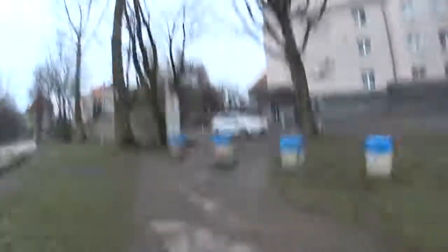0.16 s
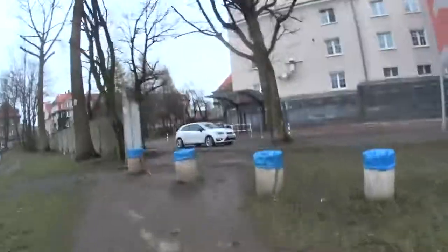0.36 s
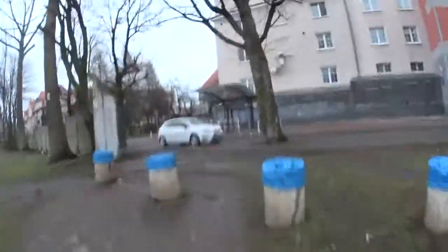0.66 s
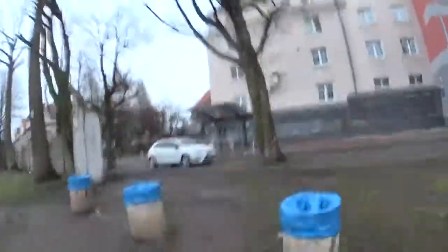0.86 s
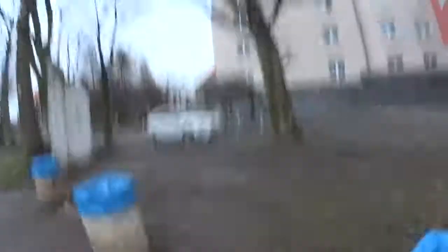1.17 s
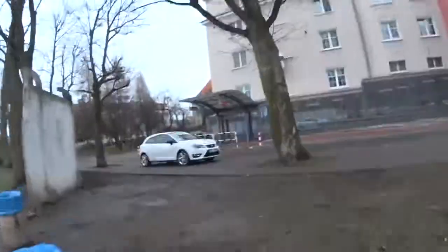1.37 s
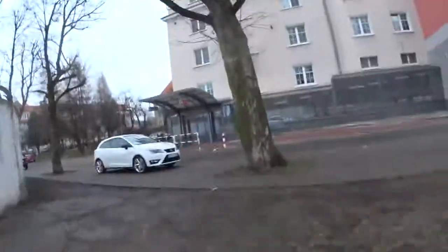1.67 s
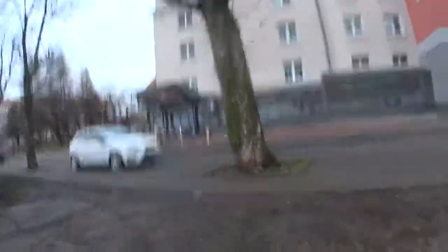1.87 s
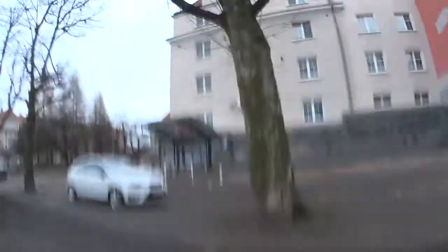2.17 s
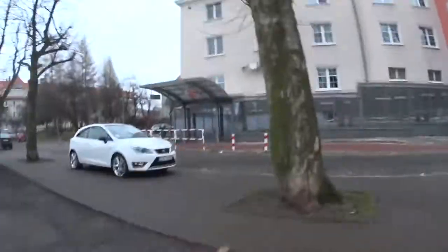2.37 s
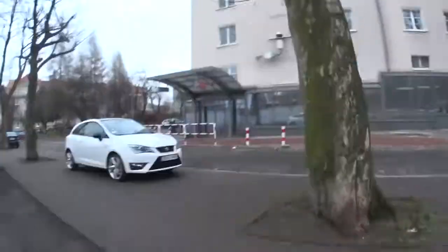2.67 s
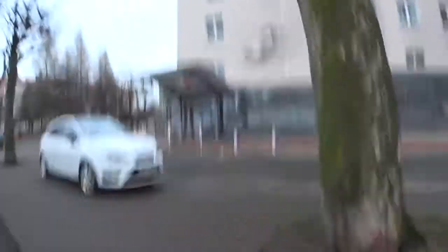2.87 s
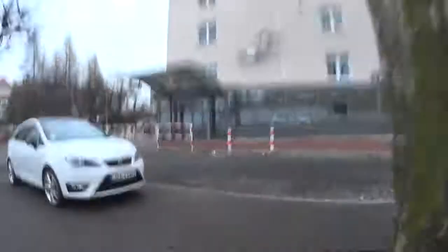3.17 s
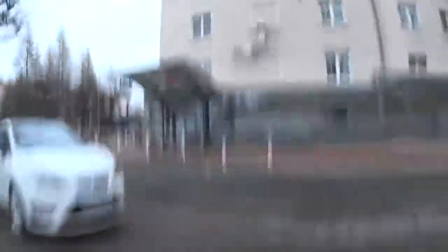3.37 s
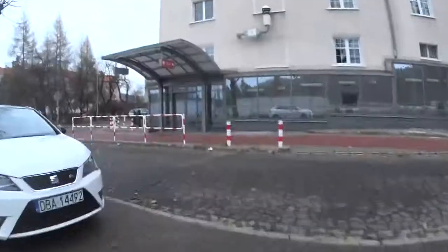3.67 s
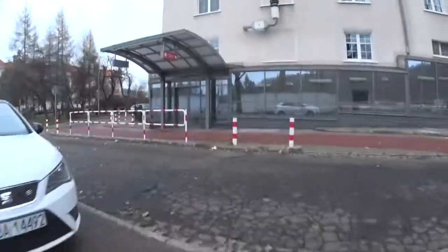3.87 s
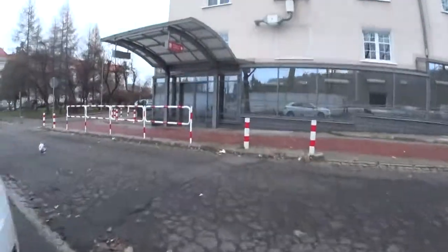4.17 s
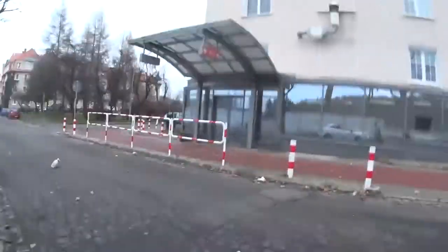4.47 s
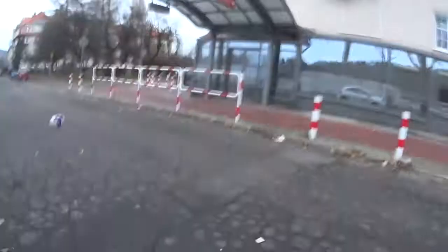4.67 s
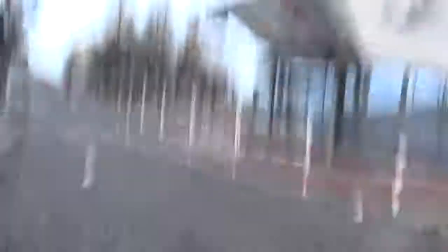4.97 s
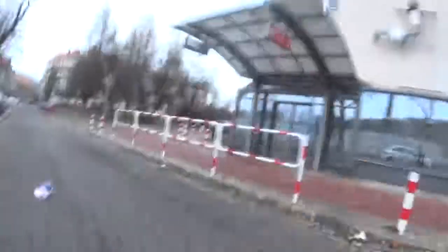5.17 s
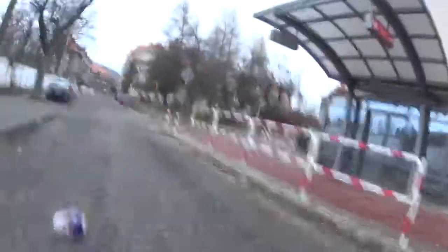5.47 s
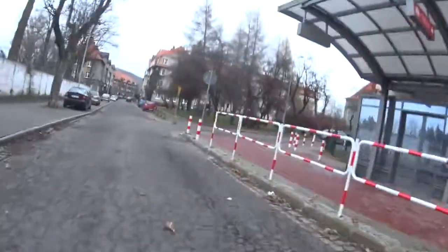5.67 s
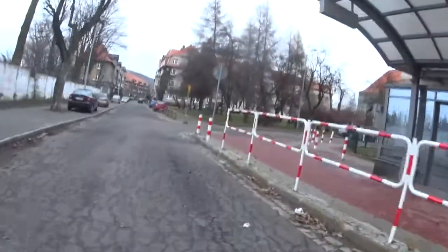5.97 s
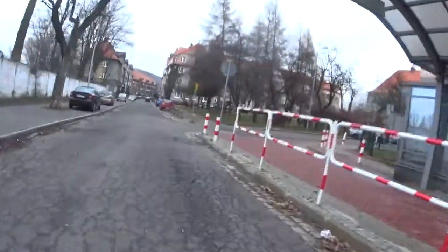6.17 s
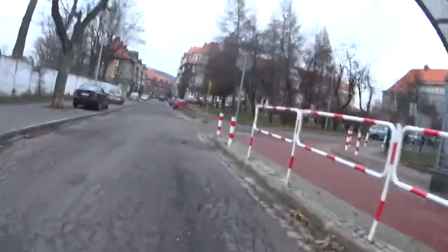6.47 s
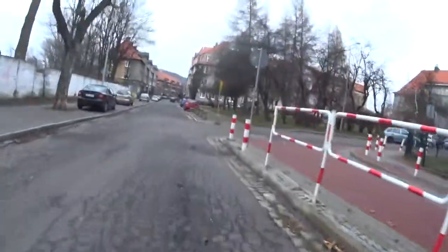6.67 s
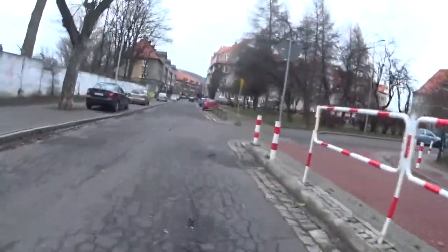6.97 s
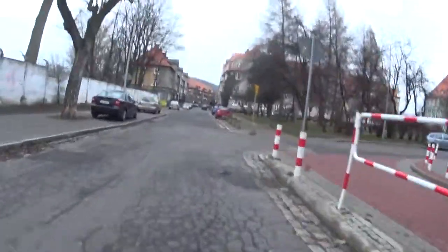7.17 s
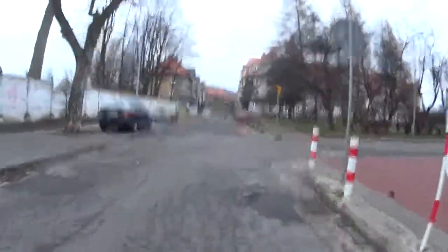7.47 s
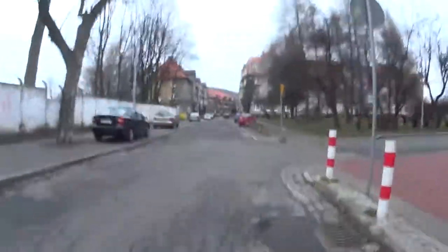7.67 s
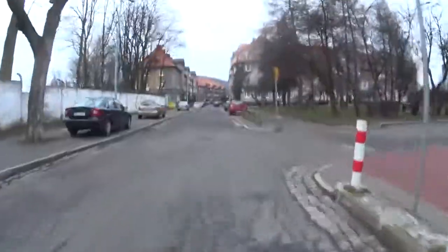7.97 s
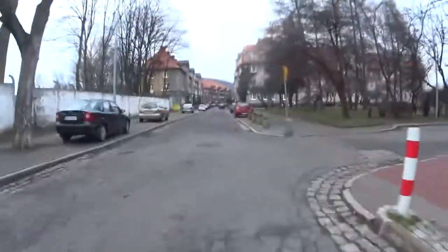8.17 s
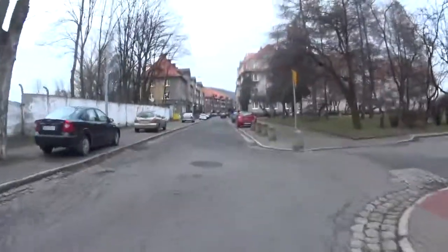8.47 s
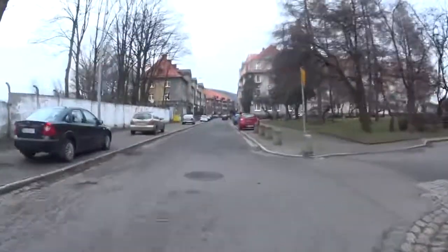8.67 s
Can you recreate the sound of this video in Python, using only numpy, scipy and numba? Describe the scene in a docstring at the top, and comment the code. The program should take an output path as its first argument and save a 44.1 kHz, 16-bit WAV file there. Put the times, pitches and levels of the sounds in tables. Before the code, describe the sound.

Hollow plastic knocks, ticks and low frame thuds over hissing tyres give way to crunching asphalt rumble and finally heavy, fluttering wind thumps.

```python
"""Knocks and low frame booms come first: a camera in a plastic mount rides a bicycle over a bumpy dirt path.
Contacts strike resonant modes for the knocks, ticks and chatter; bumps boom as short tones of falling pitch.
Tyres hiss, swish and pop over grit as filtered noise, and low noise rumbles with the shaking of the ground.
The ride picks up speed on cracked asphalt: the road drones through resonances and cracks crunch.
Wind surges, then grows towards the end: noise rushes, thumps and flutters across two microphone ports."""
import sys
import numpy as np
from scipy import signal
from scipy.fft import rfft, irfft, next_fast_len
from scipy.io import wavfile
from numba import njit

SR = 44100
rng = np.random.default_rng(int(sys.argv[2]) if len(sys.argv) > 2 else 0)


def wav_record(signal):
    """Record a signal, one row per channel, as 16-bit PCM in the file named by sys.argv[1]."""
    frames = np.transpose(np.atleast_2d(signal))
    bounded = np.clip(frames, -1, 1)
    # unit amplitude maps onto the largest positive 16-bit level
    quanta = np.round(bounded * 32767).astype(np.int16)
    wavfile.write(sys.argv[1], SR, quanta)


N = 388499
TIME = np.arange(N) / SR

# head wind, as a curve: time_s, rush_db
HEAD_WIND = [(0, -76), (1.7, -40), (3.8, -63), (4.4, -32.5), (5.8, -40.5), (6.5, -31.5), (7.2, -25),
             (8.1, -23.5), (8.3, -16), (8.5, -20.5), (8.65, -24.5), (8.81, -16)]
# spectrum of the rushing wind: freq_hz, relative_db_per_hz
RUSH_SPECTRUM = [(40, -16.5), (120, -4), (280, 2.5), (500, -4), (1000, -14.5), (1600, -18.5), (3000, -55),
                 (6000, -64), (11000, -79)]
# heavy buffets of air that thump on the ports: centre_s, half_length_s, level_db
BUFFETS = [(8.215, 0.034, -16.5), (8.256, 0.0033, -17), (8.29, 0.021, -21.5), (8.35, 0.047, -17),
           (8.445, 0.028, -13), (8.51, 0.013, -16), (8.55, 0.012, -13), (8.605, 0.023, -21),
           (8.71, 0.01, -11), (8.76, 0.04, -18)]
# spectrum of a buffet: freq_hz, relative_db_per_hz
BUFFET_SPECTRUM = [(20, -22), (55, -0.5), (130, 1), (260, -2.5), (400, -8), (700, -24), (2000, -79)]
# gusts that flutter across the ports: centre_s, half_length_s, level_db
GUSTS = [(8.214, 0.021, -16.5), (8.349, 0.01, -22.5), (8.378, 0.01, -25.5), (8.424, 0.003, -25),
         (8.49, 0.011, -26), (8.526, 0.0044, -24.5), (8.558, 0.015, -26), (8.805, 0.011, -23)]
# spectrum of the flutter: freq_hz, relative_db_per_hz
FLUTTER_SPECTRUM = [(200, -3), (700, 9.5), (1300, 1), (1800, 3.5), (2400, -4.5), (3100, -11.5), (4000, -7),
                    (7000, -28), (11000, -57)]
# port openings that colour the flutter: mode_hz, relative_db, t60_s
PORT_MODES = [(1420, 0.5, 0.014), (2040, 6, 0.016), (2590, 2.5, 0.015), (3030, -11, 0.015)]
# likeness of the two ports (0-1), phase by which left leads, balance:
# freq_hz, likeness, phase_rad, left_minus_right_db
PORT_PICKUP = [(40, .7, 0, 2), (90, .82, .1, -.5), (150, .6, .5, -3.5), (210, .45, 1.3, -3.9),
               (280, .56, 2.6, -2.7), (550, .75, 2.8, -1.5), (1350, .88, 2.5, -1), (2000, .55, 3.8, 0),
               (3300, .35, 4.9, 0), (4500, .42, 5.5, 0), (11000, .52, 5.8, 0)]

# drone of the tyres on asphalt, as a curve: time_s, level_db
ROAD_DRONE = [(3.3, -54), (3.8, -36), (4.3, -37.5), (4.7, -33), (5.2, -37), (5.75, -40.5), (6.2, -28),
              (6.8, -27), (8.1, -26), (8.81, -27)]
# resonances of the drone: mode_hz, relative_db, t60_s
DRONE_MODES = [(70.6, -2.5, 0.2), (102, 2, 0.094), (173, -2.5, 0.068), (209.7, -2, 0.16),
               (278.3, 0.5, 0.12)]
# spectrum of the frame and eddy rumble: freq_hz, relative_db_per_hz
RUMBLE_SPECTRUM = [(15, -6), (30, -24), (60, -4.5), (100, -3), (170, -1.5), (230, -4), (350, -7.5),
                   (550, -13), (1200, -49), (4000, -98)]
# tread hiss on damp ground before the jolts raise it, as a curve: time_s, hiss_db
TREAD_HISS = [(0, -48), (0.7, -45), (1.3, -53), (1.8, -59), (2.8, -39), (3.7, -47), (4.3, -48),
              (4.8, -41.5), (5.8, -43), (6.6, -58.5), (7.4, -31), (8.1, -47.5), (8.81, -58)]
# spectrum of the tread hiss: freq_hz, relative_db_per_hz
TREAD_SPECTRUM = [(200, -5), (600, 4.5), (1100, 25.5), (1900, 8), (3000, 3), (4500, 3.5), (7000, -1),
                  (9000, -3.5), (11000, -4)]
# soft high swishes, like brake pads on the rim: centre_s, half_length_s, level_db
SWISHES = [(1.25, 0.33, -46), (1.72, 0.12, -46), (2.85, 0.21, -51), (4.33, 0.089, -42.5)]
# spectrum of a swish: freq_hz, relative_db_per_hz
SWISH_SPECTRUM = [(1200, -17), (2300, -1), (3600, 3), (5000, 2.5), (7000, -1), (9000, -6), (11000, -4)]
# loose grit under the tyres, as a curve: time_s, level_db
LOOSE_GRIT = [(0, -48), (0.7, -39.5), (1.6, -44.5), (2.8, -42), (3.8, -49), (4.3, -45), (5.7, -48),
              (6.5, -40.5), (7.2, -39), (7.9, -31.5), (8.3, -38.5), (8.81, -47)]
# spectrum of a grit pop: freq_hz, relative_db_per_hz
POP_SPECTRUM = [(200, -13), (500, 1), (1100, 4), (1600, -1), (2300, -17.5), (4000, -18.5), (8000, -22),
                (11000, -24)]
# tyres crunch over cracks in the asphalt: centre_s, half_length_s, level_db
CRUNCHES = [(5.885, 0.021, -33.5), (6.09, 0.016, -33), (6.27, 0.0094, -26.5), (6.475, 0.0076, -29),
            (6.62, 0.0041, -28), (6.695, 0.011, -29), (6.9, 0.021, -27.5), (7.0, 0.018, -33),
            (7.07, 0.017, -20), (7.268, 0.018, -18), (7.4, 0.028, -28), (7.55, 0.046, -26.5),
            (7.707, 0.008, -22), (7.81, 0.043, -22.5), (7.88, 0.0079, -26.5)]
# modes of the crunch: mode_hz, relative_db, t60_s
CRUNCH_MODES = [(820, 6, 0.009), (1096, 8.5, 0.031), (1360, 6, 0.017), (1613, 4.5, 0.024)]

# rough patches that shake the bicycle: start_s, length_s, shaking_db
PATCHES = [(0.0, 0.1, -19), (0.143, 0.081, -35.5), (0.439, 0.077, -25.5), (0.703, 0.031, -26),
           (0.778, 0.039, -30), (0.858, 0.19, -21), (1.163, 0.18, -27), (1.548, 0.095, -31.5),
           (1.855, 0.039, -25), (1.91, 0.2, -29), (2.155, 0.17, -28.5), (2.419, 0.022, -22),
           (2.456, 0.2, -22.5), (2.863, 0.046, -26), (3.006, 0.2, -20), (3.215, 0.032, -25.5),
           (3.404, 0.14, -20), (4.415, 0.087, -21), (4.642, 0.12, -21.5), (4.907, 0.084, -19),
           (5.085, 0.03, -18), (5.141, 0.22, -25), (5.465, 0.085, -24.5), (7.482, 0.081, -21),
           (7.752, 0.075, -23)]
# unevenness of the ground between the patches, as a curve: time_s, shaking_db
GROUND = [(0, -32), (0.33, -42.5), (0.65, -32.5), (1.8, -40.5), (2.38, -40.5), (2.8, -30), (3.7, -37.5),
          (4.2, -36.5), (4.85, -32.5), (5.4, -30.5), (5.75, -38), (6.4, -31), (7.2, -21.5), (8.1, -22),
          (8.3, -23.5), (8.81, -18.5)]
# how the rumble follows the shaking: level_db at ROUGH_DB, db_per_db
RUMBLE_LAW = (-20, 0.84)
# how the clatter follows the shaking: level_db at ROUGH_DB, db_per_db
CLATTER_LAW = (-26, 0.96)
# how the gritty rattle follows the shaking: level_db at ROUGH_DB, db_per_db
RATTLE_LAW = (-41, 0.52)

# wheel bumps that make the frame boom: start_s, peak_db before THUMP_DB, pitch_hz at mid-fall, decay_s
THUMPS = [(0.004, -18, 190, 0.031), (0.05, -8.5, 218, 0.023), (0.256, -14, 161, 0.009),
          (0.49, -14, 292, 0.023), (0.786, -9, 195, 0.013), (0.871, -11.5, 270, 0.02),
          (0.936, -8, 282, 0.024), (0.991, -8, 74, 0.018), (1.019, -3.5, 193, 0.0057),
          (1.236, -8, 338, 0.023), (1.314, -21, 108, 0.031), (1.587, -23, 263, 0.0097),
          (1.616, -20, 285, 0.02), (1.902, -9, 275, 0.013), (1.935, -9.5, 159, 0.018),
          (2.031, -9, 267, 0.022), (2.189, -10, 328, 0.013), (2.249, -14, 250, 0.017),
          (2.279, -14, 282, 0.015), (2.479, -6.5, 274, 0.022), (2.564, -7, 262, 0.013),
          (2.644, -9, 277, 0.011), (2.907, -10, 277, 0.017), (3.042, -8, 343, 0.021),
          (3.092, -8.5, 263, 0.014), (3.121, -7.5, 135, 0.026), (3.158, -8, 300, 0.017),
          (3.248, -13, 266, 0.016), (3.406, -22, 161, 0.019), (3.454, -9, 273, 0.024),
          (3.491, -12, 177, 0.019), (3.516, -17, 214, 0.027), (3.821, -16.5, 183, 0.012),
          (4.179, -26, 291, 0.017), (4.419, -9, 190, 0.025), (4.447, -2.5, 238, 0.038),
          (4.657, -2, 85, 0.013), (4.701, -6, 107, 0.024), (4.772, -7.5, 286, 0.0089),
          (4.968, -2.5, 333, 0.012), (5.085, -13, 253, 0.018), (5.161, -2, 188, 0.012),
          (5.202, -7.5, 99, 0.019), (5.243, -8, 273, 0.022), (5.313, -6, 231, 0.0066),
          (5.455, -12, 312, 0.022), (5.508, -6, 169, 0.0071), (5.541, -17, 261, 0.012),
          (5.886, -14.5, 240, 0.02), (6.12, -10.5, 141, 0.0072), (6.475, -11, 269, 0.016),
          (6.832, -8, 164, 0.012), (6.994, -14.5, 282, 0.023), (7.071, -8, 259, 0.021),
          (7.265, -3.5, 194, 0.011), (7.535, -3.5, 178, 0.017), (7.79, -6.5, 265, 0.017),
          (7.97, -9, 256, 0.019)]
# loudest ticks, where hard edges meet: start_s, level_db before its random spread
TICKS = [(0.085, -33), (0.37, -37), (0.456, -27.5), (0.816, -22), (0.872, -34), (1.01, -29), (1.247, -43),
         (1.307, -44), (1.812, -33), (1.886, -29), (2.001, -32), (2.024, -30), (2.05, -40), (2.117, -33.5),
         (2.177, -44), (2.271, -33), (2.503, -34), (2.531, -28), (2.556, -27), (2.899, -34), (3.025, -23),
         (3.038, -34), (3.122, -30), (3.149, -26), (3.25, -33), (3.482, -24), (3.516, -41), (3.817, -37),
         (4.181, -32), (4.454, -21.5), (4.633, -25), (4.682, -37), (4.695, -34), (4.759, -38), (4.781, -44),
         (4.818, -39), (4.845, -39), (5.153, -22), (5.185, -35), (5.243, -32), (5.316, -26.5), (5.459, -29),
         (5.474, -28), (5.527, -29), (5.695, -30), (6.094, -36.5), (6.266, -28.5), (6.476, -34),
         (6.615, -33), (6.703, -39), (7.06, -51), (7.179, -36), (7.206, -31.5), (7.255, -25.5), (7.27, -33),
         (7.352, -25.5), (7.383, -33), (7.477, -29.5), (7.499, -20.5), (7.566, -33), (7.758, -22.5),
         (7.776, -26), (7.808, -26.5), (7.882, -29)]
# broad modes of the small hard parts: mode_hz, relative_db, t60_s
EDGE_MODES = [(2220, -0.5, 0.003), (3430, 1, 0.0035), (4940, -2, 0.00057), (6680, 4.5, 0.0011),
              (10440, -4, 0.002)]
# the camera knocks in its mount; the dull last rows are thumps of wind:
# start_s, strength_db, hardness (about -1 dull to 1 sharp), ring pitch_hz
KNOCKS = [(0.012, -12.5, 0.56, 626), (0.035, -24, -0.3, 866), (0.058, -22, -0.31, 1120),
          (0.074, -22.0, 0.38, 516), (0.083, -10, 0.19, 1064), (0.102, -22, -0.6, 856),
          (0.158, -24.5, -0.45, 760), (0.168, -28.0, -0.44, 740), (0.184, -28.5, 0.0, 1040),
          (0.246, -23.5, 0.27, 860), (0.457, -20.0, 0.71, 910), (0.491, -17.5, -0.076, 910),
          (0.702, -28.5, 0.13, 1040), (0.778, -18, 0.4, 940), (0.791, -20, -0.44, 1060),
          (0.8177, -18.5, 0.26, 870), (0.863, -16, 0.3, 910), (0.877, -17.5, -0.34, 1360),
          (0.936, -21.0, 0.23, 875), (0.946, -19.0, -0.56, 680), (0.967, -22, 0.39, 1010),
          (1.009, -21.5, 0.9, 820), (1.018, -19.5, 0.11, 650), (1.166, -23.0, -0.05, 910),
          (1.186, -19.5, 0.55, 805), (1.199, -27, -0.99, 835), (1.213, -25, -0.92, 540),
          (1.235, -16.0, 0.69, 765), (1.245, -10, 0.22, 620), (1.262, -20, -0.5, 566),
          (1.307, -16, 0.095, 630), (1.32, -21.5, 0.22, 650), (1.334, -18, 0.0, 734),
          (1.364, -19.5, -0.085, 1060), (1.571, -28, -0.2, 920), (1.618, -24, 0.37, 850),
          (1.903, -20, -0.94, 930), (1.93, -19.5, 0.8, 826), (1.943, -16, -0.39, 584),
          (1.971, -24, -0.67, 520), (2.025, -18, 0.0, 900), (2.037, -24, -0.46, 760),
          (2.048, -21.5, 0.21, 880), (2.118, -19, 0.063, 1390), (2.177, -17.5, 1, 517),
          (2.193, -20.0, -0.69, 650), (2.212, -28, -0.5, 840), (2.254, -25.5, -1.23, 1350),
          (2.272, -18.5, 0.75, 855), (2.311, -22, 0.73, 724), (2.462, -18.5, 0.8, 1060),
          (2.485, -24, -0.5, 600), (2.506, -17.5, 0.019, 1030), (2.558, -21.5, 0.93, 930),
          (2.569, -21, 0.0, 580), (2.634, -18.5, 0.22, 1140), (2.768, -33, -0.47, 1050),
          (2.898, -12.5, 0.18, 890), (2.926, -23, -0.91, 970), (2.971, -30.5, -0.49, 1040),
          (3.025, -22, -0.38, 524), (3.04, -17.5, 0.9, 537), (3.052, -19, -0.95, 650),
          (3.102, -27, -0.13, 730), (3.135, -27, -0.3, 610), (3.15, -20, 0.58, 860), (3.16, -20, 0.26, 935),
          (3.187, -19.5, 0.46, 680), (3.236, -21, 0.37, 1090), (3.248, -20.5, -0.33, 1130),
          (3.341, -36, -1.2, 1070), (3.355, -29, -1.04, 950), (3.402, -20.5, 0.53, 890),
          (3.417, -17, -0.9, 696), (3.436, -19.5, -0.032, 850), (3.458, -26, -0.55, 825),
          (3.483, -19.0, 0.84, 900), (3.491, -14, 0.15, 1220), (3.516, -17.5, 0.57, 790),
          (3.777, -37, 0.95, 517), (3.859, -35, -0.95, 510), (3.974, -39, -0.1, 517),
          (4.063, -40, -0.97, 520), (4.117, -49, 0.0, 520), (4.178, -31.5, -0.76, 600),
          (4.42, -23, 0.68, 1130), (4.463, -17.5, 0.0, 980), (4.477, -21, -0.1, 720),
          (4.633, -28, 1.0, 520), (4.643, -16.5, -0.58, 1220), (4.651, -18.5, -0.0035, 540),
          (4.669, -20.5, -0.64, 945), (4.683, -23, 0.98, 810), (4.744, -25.5, 0.41, 710),
          (4.781, -16.0, -0.1, 820), (4.787, -22.5, -0.049, 1460), (4.9241, -14, 0.4, 690),
          (4.968, -24, 0.28, 650), (4.996, -22.0, 0.64, 920), (5.009, -20.5, -0.3, 570),
          (5.03, -20.5, -0.64, 800), (5.079, -19.5, 0.54, 865), (5.093, -20.5, -0.6, 1300),
          (5.105, -25, -0.39, 900), (5.152, -20, 0.86, 1070), (5.162, -15.5, 0.073, 1355),
          (5.184, -16.5, 0.66, 860), (5.207, -20, -0.12, 870), (5.241, -17, 0.69, 820),
          (5.251, -20, 0.42, 1270), (5.268, -14.5, 0.0, 1010), (5.278, -21, 0.53, 845),
          (5.313, -19.5, -0.35, 885), (5.401, -28.5, -0.34, 870), (5.458, -24, -0.37, 1080),
          (5.483, -20.0, -0.29, 596), (5.511, -21, 0.54, 1050), (5.524, -34, -0.2, 1140),
          (5.541, -19, 0.0, 900), (5.697, -38, 0.3, 930), (5.884, -37, -0.95, 514),
          (6.267, -33.0, 0.24, 880), (6.337, -30.5, -0.0091, 1130), (6.694, -30, 0.7, 1600),
          (6.768, -38, -0.71, 520), (6.843, -30, -1.1, 520), (6.898, -21.5, -0.46, 1500),
          (6.996, -23.5, -0.5, 1120), (7.03, -26, -0.22, 1040), (7.163, -32, 0.1, 1100),
          (7.18, -22, -0.87, 1110), (7.252, -21.5, 0.036, 1090), (7.277, -21, -0.3, 1340),
          (7.353, -19.5, -0.17, 1030), (7.397, -21, 0.2, 1020), (7.414, -25, -0.4, 930),
          (7.497, -26, -0.44, 1090), (7.533, -22.5, 0.61, 1110), (7.543, -20, -0.28, 730),
          (7.555, -24, -0.28, 1150), (7.567, -23, 1, 830), (7.578, -25, -0.42, 1320),
          (7.605, -23, -0.74, 824), (7.654, -20.5, 0.14, 920), (7.665, -25, -0.76, 1100),
          (7.68, -22.5, -0.45, 1080), (7.692, -20, 0.82, 945), (7.702, -20.5, 0.2, 1330),
          (7.713, -27, -0.5, 880), (7.758, -21, 0.099, 1150), (7.777, -18, 0.53, 1000),
          (7.799, -31, -0.9, 1060), (7.817, -22, -0.3, 1050), (7.824, -17, -0.1, 1290),
          (7.842, -20, -0.2, 920), (7.853, -22, 0.0, 1120), (7.87, -24, -0.4, 1100),
          (7.981, -29, -0.95, 550), (8.023, -33, -0.42, 586), (8.201, -28, 0.8, 610),
          (8.279, -28, -0.64, 560), (8.46, -24.5, -1.3, 520), (8.495, -36, 0.3, 1010),
          (8.506, -25.0, -0.91, 520), (8.56, -24, 0.58, 520), (8.596, -36, -0.75, 630),
          (8.711, -31, -1.0, 520), (8.764, -35, -0.6, 580)]
# modes of the mount: mode_hz, relative_db, t60_s
MOUNT_MODES = [(426, 4, 0.018), (606, -0.5, 0.021), (763, 4.5, 0.02), (972, 2, 0.015), (1175, -1, 0.02),
               (1392, -0.5, 0.057), (1590, -13.5, 0.018)]
# modes of the frame: mode_hz, relative_db, t60_s
FRAME_MODES = [(63.3, -2.5, 0.023), (113, -1, 0.026), (190, -2.5, 0.011), (274.8, 1, 0.081),
               (345, -7, 0.059)]
# spectrum of a knock's crack: freq_hz, relative_db_per_hz
CRACK_SPECTRUM = [(500, 12.5), (1500, -1), (2500, -2.5), (3600, -6), (5000, -11), (7500, -18.5),
                  (11000, -21.5)]

BAND_EDGE_HZ, CUTOFF_HZ = 11030, 14900  # top cut before and after the overload
PORT_RING_DB = -11  # relative to the gust
ROUGH_DB = -20  # shaking at which each law gives its stated level
ATTACK_S, RELEASE_S = 0.016, 0.0079  # shaking builds up and dies away
AFTERSHAKE_DB, AFTERSHAKE_S = -0.5, 0.012  # each row of KNOCKS leaves a little shaking behind
# near the end, as the gusts begin, the loose parts stop rattling with the ground
LATE_CALM_S, LATE_CALM_DB = (8.11, 8.26), (-10, -45)
CRUNCH_SHAKE_DB, CRUNCH_GRIT_DB = -2.5, -17.5  # shaking and thrown grit, relative to the crunch
TREAD_FOLLOWS = 0.43  # dB of hiss per dB by which the shaking exceeds the ground's own
PLAY_TURNS_PER_S = 70  # contacts seat differently, which shifts the modes
KNOCK_SPREAD_DB, TICK_SPREAD_DB = 2, 5  # force on one mode differs by up to this, either way
THUD_DB, THUD_PER_HARDNESS_DB = -2.5, -10  # a hard blow thuds less
CRACK_DB, CRACK_PER_HARDNESS_DB = -14, 11.5  # and cracks more
RING_DB, RING_RISE_S, RING_DECAY_S = 9, 0.00078, 0.0025  # peak relative to the blow's strength
MOUNT_DB = -3  # other mount modes, relative to the blow
SMALL_KNOCKS_PER_S, SMALL_KNOCKS_DB = 65, 0.5  # by chance; relative to the clatter
SMALL_TICKS_PER_S, SMALL_TICKS_DB = 60, -5.5  # by chance; relative to the rattle
THUMP_DB, THUMP_RISE_S = -6, 0.0019  # the tyre cushions the bump
THUMP_SAG = 0.28  # the squeezed tyre relaxes: from half this share sharp to half of it flat


def from_db(db):
    """Decibels to gain."""
    return 10 ** (np.asarray(db) / 20)


def rms_one(x):
    """Scale to rms 1."""
    return x / np.sqrt(np.mean(x ** 2) + 1e-20)


def in_time(rows):
    """The columns of a curve at every sample."""
    s, *columns = np.transpose(rows)
    return [np.interp(TIME, s, column) for column in columns]


def at_hz(rows, hz):
    """The columns of a spectrum, joined on a log-frequency axis."""
    points, *columns = np.transpose(rows)
    return [np.interp(np.log(hz + 1), np.log(points), column) for column in columns]


def chance(size):
    """Even draws between minus one and one."""
    return rng.uniform(-1, 1, size)


def drift(rate):
    """Slow chance: normal draws, rate of them a second, joined by straight lines."""
    knots = rng.standard_normal(4096)
    return np.interp(TIME * rate, np.arange(len(knots)), knots)


def noise():
    """White noise, independent in two channels."""
    return rng.standard_normal((2, N))


def colour(x, spectrum):
    """A causal minimum-phase filter of the given spectrum that keeps the power of white noise."""
    size = 2 ** 19
    level_db, = at_hz(spectrum, np.arange(size // 2 + 1) * SR / size)
    cepstrum = irfft(np.log(rms_one(from_db(level_db))))
    # fold the cepstrum forward in time to make the filter causal
    cepstrum[1:size // 2] *= 2
    cepstrum[size // 2 + 1:] = 0
    response = np.exp(rfft(cepstrum))
    return irfft(rfft(x, size) * response)[..., :N]


def soften(x, edge_hz):
    """Plastic gives way on contact and takes the edge off: a steep low-pass."""
    return signal.sosfilt(signal.butter(7, edge_hz, fs=SR, output="sos"), x)


@njit
def resonate(x, turn, r):
    """A two-pole resonance whose centre, in radians per sample, may move."""
    y = np.zeros_like(x)
    for i in range(2, x.shape[1]):
        pull = 2 * r * np.cos(turn[i])
        for c in range(2):
            y[c, i] = x[c, i] - x[c, i - 2] + pull * y[c, i - 1] - r * r * y[c, i - 2] + 1e-18
    return y


def ring(x, hz, t60):
    """A resonance, falling 60 dB in t60 seconds, that keeps the power of white noise."""
    r = np.exp(-np.log(1000) / (t60 * SR))
    return np.sqrt((1 - r * r) / 2) * resonate(x, 2 * np.pi * hz / SR, r)


def body(strike, modes, play):
    """Calls strike afresh for each mode; modes share the power and wander in pitch by the share play."""
    shares = from_db([db for hz, db, t60 in modes])
    shares = shares / np.linalg.norm(shares)
    out = np.zeros((2, N))
    for share, (hz, db, t60) in zip(shares, modes):
        blow = strike()
        moving_hz = hz * (1 + play * drift(PLAY_TURNS_PER_S))
        out += share * ring(blow, moving_hz, t60)
    return out


def contacts(times, levels_db, length, spread_db, bounce, bounce_s):
    """A click per contact, with the energy of its level held for length s, and a rebound of chance size."""
    out = np.zeros((2, N))
    for side in out:
        force, push, wait, rebound = chance((len(times), 4)).T
        height = from_db(levels_db + spread_db * force) * np.sqrt(length * SR)
        rebound_delay = bounce_s * (1 + 0.679 * wait)
        for delay, share in ((0, np.sign(push)), (rebound_delay, bounce * rebound)):
            place = np.clip((times + delay) * SR, 0, N - 1).astype(int)
            side[place] += height * share
    return out


def grains(per_s, spread_db):
    """Moments and sizes of small random contacts; rms 1."""
    hits = rng.random(N) < per_s / SR
    return rms_one(hits * from_db(spread_db * chance(N)))


def chatter(bumps, modes, play):
    """Small bumps of random sign, struck into a set of modes."""
    return body(lambda: bumps * rng.choice([-1., 1.], (2, N)), modes, play)


def scuff(clicks, decay_s):
    """Each contact rubs for a moment: a puff of noise that dies at once."""
    r = np.exp(-1 / (decay_s * SR))
    power = signal.lfilter([1 - r], [1, -r], clicks ** 2 + 1e-18)
    return np.sqrt(power) * noise()


def swells(rows):
    """A quick rise, a rounded top and a quick fall for each row."""
    out = np.zeros(N)
    for s, half_length, db in rows:
        near = slice(*np.searchsorted(TIME, [s - 10 * half_length, s + 10 * half_length]))
        distance = np.abs((TIME[near] - s) / half_length)
        out[near] += from_db(db) / np.sqrt(1 + distance ** 8)
    return out


def rings(s, peak_db, hz, decay_s, rise_s, sag):
    """One dying tone for each blow, at a chance phase; its pitch falls by the share sag as it fades."""
    out = np.zeros((2, N))
    phases = np.pi * chance((len(s), 2, 1))
    for start, db, pitch, decay, phase in zip(s, peak_db, hz, decay_s, phases):
        near = slice(*np.searchsorted(TIME, [start, start + 10 * decay]))
        age = TIME[near] - start
        fade = np.exp(-age / decay)
        swell = (1 - np.exp(-age / rise_s)) * fade
        cycles = np.cumsum(pitch * (1 + sag * (fade - .5))) / SR
        tone = np.sin(2 * np.pi * cycles + phase)
        out[:, near] += from_db(db) * swell / swell.max() * tone
    return out


def patches():
    """Each rough patch sets the bicycle shaking: attack, hold, release."""
    out = np.zeros(N)
    for s, length, db in PATCHES:
        near = slice(*np.searchsorted(TIME, [s - ATTACK_S, s + length + 10 * RELEASE_S]))
        age = TIME[near] - s
        attack = np.minimum(1 + age / ATTACK_S, 1)
        release = np.exp(-np.maximum(age - length, 0) / RELEASE_S)
        out[near] = np.hypot(out[near], from_db(db) * attack * release)
    return out


def aftershake():
    """The energy of each blow in KNOCKS dies away as shaking."""
    s, knock_db, *_ = np.transpose(KNOCKS)
    energy = np.bincount((s * SR).astype(int), from_db(knock_db + AFTERSHAKE_DB) ** 2, N)
    keep = np.exp(-2 / (AFTERSHAKE_S * SR))
    return np.sqrt(signal.lfilter([1], [1, -keep], energy + 1e-18))


def follow(shaking, law):
    """A layer's level in dB rises with the shaking."""
    level_db, slope = law
    return level_db + slope * (20 * np.log10(shaking) - ROUGH_DB)


def wind():
    """Head wind rushes unevenly and thumps in heavy buffets; gusts flutter in quick snaps at the ports."""
    rush_db, = in_time(HEAD_WIND)
    eddies_db = 3 * drift(90) + 3.0 * drift(25)
    rush = colour(noise() * from_db(rush_db + eddies_db), RUSH_SPECTRUM)
    buffets = colour(noise() * swells(BUFFETS), BUFFET_SPECTRUM)
    snaps = scuff(grains(per_s=840, spread_db=7.5), decay_s=0.00078)
    gusts = snaps * swells(GUSTS)
    flutter = from_db(1.0) * colour(gusts, FLUTTER_SPECTRUM)
    rasp = from_db(PORT_RING_DB) * body(lambda: gusts, PORT_MODES, play=0.03)
    return rush + buffets + flutter + rasp


def drone():
    """The grain of the asphalt keeps tyres and frame humming: noise through low resonances."""
    road_db, = in_time(ROAD_DRONE)
    return from_db(road_db) * body(noise, DRONE_MODES, play=0.023)


def rumble(level_db):
    """The road shakes the frame and eddies press on the ports: lumpy low noise."""
    return from_db(level_db) * colour(noise() * from_db(4.0 * drift(45)), RUMBLE_SPECTRUM)


def tyres(hiss_db):
    """Tread hisses on the damp ground, with now and then a swish above it."""
    tread = colour(noise() * from_db(hiss_db + 6.1 * drift(90)), TREAD_SPECTRUM)
    swish = colour(noise() * swells(SWISHES), SWISH_SPECTRUM)
    return tread + swish


def gravel():
    """Single bits of grit pop under the tyres, some much louder than the rest."""
    gravel_db, = in_time(LOOSE_GRIT)
    pops = from_db(gravel_db) * grains(per_s=70, spread_db=11.5)
    return colour(scuff(pops, decay_s=0.0014), POP_SPECTRUM)


def thumps():
    """Bumps come through the tyres as low ringing thuds."""
    s, thump_db, hz, decay_s = np.transpose(THUMPS)
    return rings(s, thump_db + THUMP_DB, hz, decay_s, THUMP_RISE_S, THUMP_SAG)


def ticks(rattle_db):
    """Sharp ticks of hard edges over a fine gritty rattle; each favours other modes."""
    s, tick_db = np.transpose(TICKS)
    thrown_grit = from_db(CRUNCH_GRIT_DB) * swells(CRUNCHES)
    rattle = np.hypot(from_db(rattle_db), thrown_grit)
    fine_grains = from_db(-4.0) * grains(per_s=500, spread_db=9.0)
    small_ticks = from_db(SMALL_TICKS_DB) * grains(SMALL_TICKS_PER_S, spread_db=2.5)
    grit = rattle * (fine_grains + small_ticks)

    def strike():
        """The same contacts, with new strengths."""
        sharp = contacts(s, tick_db, length=0.0022, spread_db=TICK_SPREAD_DB, bounce=1.0, bounce_s=0.0074)
        fine = grit * from_db(TICK_SPREAD_DB * chance(N))
        return scuff(sharp, decay_s=0.00085) + scuff(fine, decay_s=0.00046)

    return body(strike, EDGE_MODES, play=0.027)


def clatter(level_db):
    """Small bumps keep the mount chattering between the big jolts; cracked asphalt crunches."""
    bumps = from_db(1.0) * grains(per_s=200, spread_db=4.5)
    small_knocks = from_db(SMALL_KNOCKS_DB) * grains(SMALL_KNOCKS_PER_S, spread_db=1.0)
    mount = chatter(from_db(level_db) * (bumps + small_knocks), MOUNT_MODES, play=0.076)
    crack_grains = swells(CRUNCHES) * grains(per_s=130, spread_db=1.0)
    crunch = chatter(crack_grains, CRUNCH_MODES, play=0.026)
    return soften(mount + crunch, edge_hz=2030)


def knocks():
    """Knocks crack, ring the mount briefly and thud in the frame; the dull last ones thump like wind."""
    s, knock_db, hardness, pitch_hz = np.transpose(KNOCKS)
    thud_db = knock_db + THUD_DB + THUD_PER_HARDNESS_DB * hardness
    crack_db = knock_db + CRACK_DB + CRACK_PER_HARDNESS_DB * hardness

    def hit_mount():
        """Blows on the mount modes, with a strong rebound."""
        return contacts(s, knock_db + MOUNT_DB, length=0.018, spread_db=KNOCK_SPREAD_DB,
                        bounce=0.77, bounce_s=0.00357)

    def hit_frame():
        """Blows on the frame modes, with little rebound."""
        return contacts(s, thud_db, length=0.0093, spread_db=KNOCK_SPREAD_DB,
                        bounce=0.085, bounce_s=0.00555)

    mount = soften(body(hit_mount, MOUNT_MODES, play=0.081), edge_hz=1865)
    frame = soften(body(hit_frame, FRAME_MODES, play=0.039), edge_hz=890)
    snap = contacts(s, crack_db, length=0.029, spread_db=KNOCK_SPREAD_DB, bounce=0.33, bounce_s=0.0057)
    crack = colour(scuff(snap, decay_s=0.0011), CRACK_SPECTRUM)
    # the ring's pitch is set by how the mount seats
    decays_s = np.full(len(s), RING_DECAY_S)
    tone = rings(s, knock_db + RING_DB, pitch_hz, decays_s, RING_RISE_S, sag=0.07)
    return tone + mount + frame + crack


def two_ports(x):
    """Bass is largely shared, the middle arrives almost in opposite phase, the treble is diffuse."""
    size = next_fast_len(N + 4096)
    shared, own = rfft(x, size)
    alike, phase, balance_db = at_hz(PORT_PICKUP, np.arange(len(shared)) * SR / size)
    alike = np.clip(alike, 0, 1)
    shared = np.sqrt((1 + alike) / 2) * shared
    own = np.sqrt((1 - alike) / 2) * own
    # half the level and phase difference goes to each side
    turn = from_db(balance_db / 2) * np.exp(1j * phase / 2)
    left, right = (shared + own) * turn, (shared - own) / turn
    return irfft(np.array([left, right]), size)[:, :N]


def scene():
    """The ground shakes the bicycle; wind, tyres, frame and mount, as the camera's ports pick them up."""
    ground_db, = in_time(GROUND)
    hiss_db, = in_time(TREAD_HISS)
    jolts = np.hypot(patches(), aftershake())
    crunch_shake = from_db(CRUNCH_SHAKE_DB) * swells(CRUNCHES)
    shaking = np.sqrt(jolts ** 2 + from_db(ground_db) ** 2 + crunch_shake ** 2)
    # what reaches the loose parts: jolts, plus a reduced share of the ground
    calm_db = np.interp(TIME, LATE_CALM_S, LATE_CALM_DB)
    jarring = np.hypot(jolts, from_db(ground_db + calm_db))
    excess_db = 20 * np.log10(shaking) - ground_db
    background = wind() + drone()
    rolling = rumble(follow(shaking, RUMBLE_LAW)) + tyres(hiss_db + TREAD_FOLLOWS * excess_db)
    bicycle = rolling + gravel() + thumps()
    camera = ticks(follow(jarring, RATTLE_LAW)) + clatter(follow(jarring, CLATTER_LAW)) + knocks()
    return two_ports(background + bicycle + camera)


def record(dry):
    """The top is cut; the loudest peaks overload softly and spill a little above it."""
    narrow = signal.sosfilt(signal.ellip(10, .1, 70, BAND_EDGE_HZ, fs=SR, output="sos"), dry)
    rounded = narrow / (1 + narrow ** 4) ** .25
    return signal.sosfilt(signal.ellip(10, .1, 70, CUTOFF_HZ, fs=SR, output="sos"), rounded)


dry = scene()
out = record(dry)
wav_record(out)
```